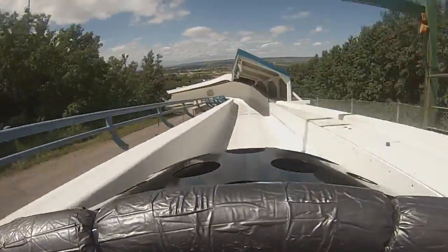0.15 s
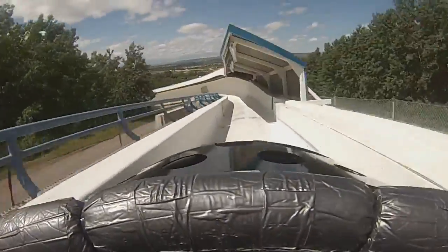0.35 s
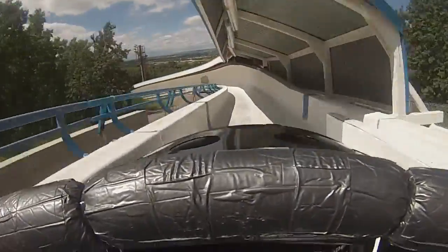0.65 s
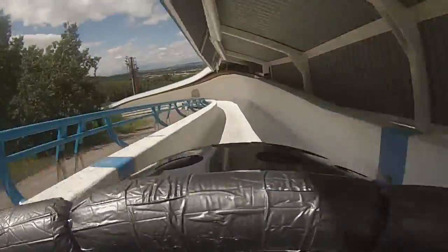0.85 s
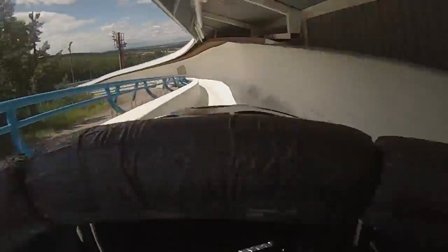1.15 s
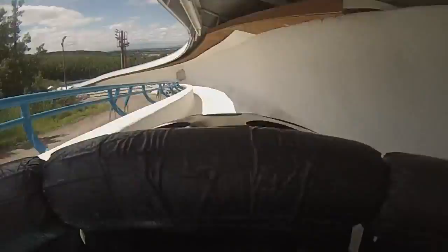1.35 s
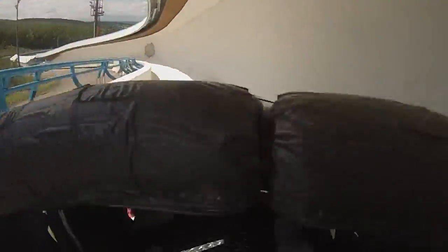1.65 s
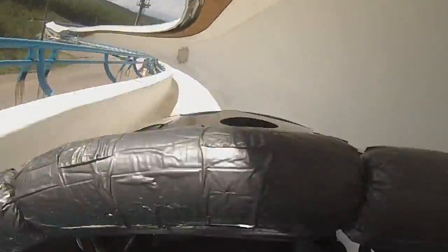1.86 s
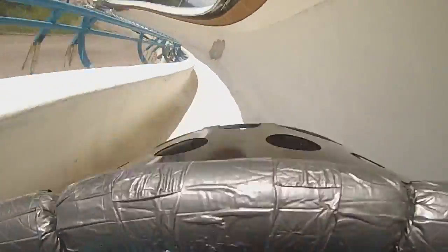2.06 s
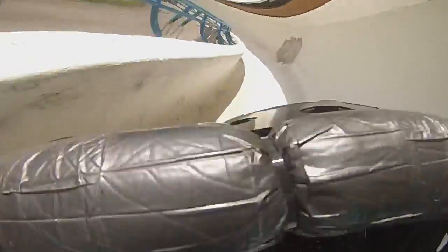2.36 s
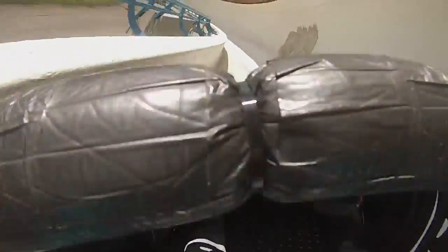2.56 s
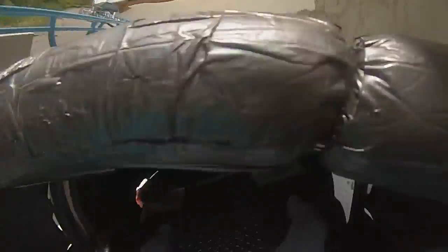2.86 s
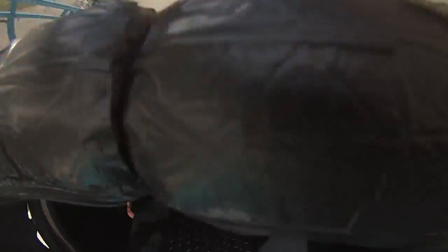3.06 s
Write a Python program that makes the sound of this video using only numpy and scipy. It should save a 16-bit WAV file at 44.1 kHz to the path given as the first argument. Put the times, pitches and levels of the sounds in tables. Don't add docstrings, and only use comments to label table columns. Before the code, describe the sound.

A wheeled sled roars over concrete throughout, gritty and bright, heard close and boxy inside an onboard housing. Thumps and ringing jolts cluster from 0.2 to 0.9 seconds, peaking in a hard thump near 0.93. The roar drops around 1.0-1.3, swells near 1.6, thumps at 1.9 and 2.2, then rebuilds from 2.5 with rattles and scrapes, loudest after 2.9. Wind rumbles and buffets underneath.

```python
import sys
import numpy as np
from scipy import signal
from scipy.fft import rfft, irfft, next_fast_len
from scipy.io import wavfile
from scipy.ndimage import uniform_filter1d, map_coordinates

SR = 44100
rng = np.random.default_rng(int(sys.argv[2]) if len(sys.argv) > 2 else 0)


def store_pcm(level_fs):
    pcm = np.round(np.clip(level_fs, -1, 1) * 32767).astype(np.int16)
    wavfile.write(sys.argv[1], SR, np.atleast_2d(pcm).T)


def gain_from_db(level_db):
    decades = np.asarray(level_db, float) / 20
    return 10 ** decades


N = 141561

# (time [s], strength [dB], brightness [dB], hull
# load [dB])
ROLLING_COURSE = [(0.0, -24, -1.5, 4), (0.19, -20.5, 3.5, 4), (0.25, -26, 0.5, 2), (0.39, -20, -1, 5),
                  (0.87, -15, 1, -1.5), (0.934, -21, -4, -18), (0.948, -36.5, 1, 5), (1.05, -26.5, 0, 0),
                  (1.23, -29.5, -3.5, 8.5), (1.27, -25.5, 2, 4.5), (1.64, -18.5, -0.5, 1.5),
                  (2.15, -27, 1, 6), (2.5, -20.5, -1, 1.5), (2.96, -15, 2.5, -1.5), (3.0, -19.5, -3.5, 8),
                  (3.02, -13.5, -4.5, -7.5), (3.15, -18.5, 1, 6.5), (3.21, -11.5, -4, -3)]
# (time [s], hiss swing [dB], cavity swing [dB], half length [s])
CONCRETE_PATCHES = [(0.132, -5, 2, 0.023), (1.983, 1.5, 1, 0.035), (0.9, 3, 1.5, 0.03),
                    (0.325, -8, 5, 0.0069), (0.397, 3.5, 4, 0.035), (0.498, 5, 1, 0.03),
                    (0.572, 4, 1.5, 0.022), (3.02, 4.5, -2.5, 0.056), (0.738, 2.5, 5, 0.023),
                    (0.808, 0, -15, 0.011), (0.828, 4.5, 6, 0.039), (0.976, 9.5, 5.5, 0.05),
                    (1.13, 6.5, 6, 0.027), (1.172, -9.5, 0, 0.014), (1.304, -9, -3, 0.021),
                    (1.404, 4, 2, 0.017), (1.455, -4, -5, 0.11), (1.504, 5.5, 4, 0.012),
                    (1.589, 3, 7.5, 0.011), (1.742, 3.5, 5, 0.036), (1.864, -3.5, -6.5, 0.042),
                    (1.895, 7.5, 11.5, 0.014), (2.12, -8, -7, 0.037), (2.374, 4.5, -4, 0.017),
                    (2.51, 8, -0.5, 0.032), (2.631, 3.5, 5, 0.024), (2.761, 2, 4, 0.047),
                    (2.832, -5, -14, 0.034), (2.86, 2, 3.5, 0.027), (2.93, -2, 2, .018)]
# (time [s], peak [dB], rise [s], low push [dB], t60 [s])
TRACK_JOINTS = [(.232, -3, 0.0069, -23, 0.12), (0.2443, -12, 0.004, -8, .045),
                (0.2572, -3, 0.0029, -13, 0.08), (0.4294, -9, 0.0024, -24, 0.12),
                (.462, -13, 0.0018, -18, 0.071), (0.528, -26, .003, -15, 0.12),
                (0.609, -17, 0.0034, -23, 0.24), (0.651, -19, .003, -20, 0.19),
                (0.722, -19.5, 0.0025, -26, 0.14), (0.791, -19, 0.0028, -30, 0.12),
                (0.928, 1, 0.001, -9, 0.047), (1.476, -22.5, 0.0045, -30, 0.31),
                (1.622, -17, 0.0071, -34, 0.2), (1.9174, -6, 0.00052, -4, 0.14),
                (2.2019, -3, 0.004, -8.5, 0.13), (2.639, -11.5, 0.0046, -32, 0.15),
                (2.896, -29, .003, -19, 0.31)]
# (time [s], peak [dB], half length [s])
WIND_HEAVES = [(.089, -18, 0.013), (.252, -23, 0.0079), (0.442, -11.5, 0.01), (0.607, -16.5, 0.015),
               (0.705, -16, 0.0084), (0.749, -12.5, .013), (0.828, -36, 0.016), (0.91, -23, 0.0089),
               (1.538, -18.5, 0.013), (1.807, -12.5, 0.019), (1.872, -18, 0.02), (2.249, -25, 0.0072),
               (2.501, -23, .011), (2.77, -14, 0.02), (3.076, -19, .02), (3.14, -20, 0.013)]
# (time [s], level [dB])
MOUNT_RATTLES = [(.145, -17.5), (0.191, -19), (.485, -27), (.575, -30), (0.823, -22), (1.496, -16.5),
                 (1.891, -19), (1.91, -27), (1.976, -20), (2.211, -31), (2.368, -32), (2.485, -15.5),
                 (2.509, -17.5), (2.637, -14), (2.86, -20), (2.933, -13), (2.962, -11.5), (3.021, -15)]
# (time [s], peak [dB], pitch [Hz], t60 [s])
AIR_RINGS = [(0.1086, -13, 1468, 0.12), (0.1436, -10.5, 1490, 0.094), (0.395, -12.5, 1604, 0.16),
             (0.507, -10.5, 1492, 0.12), (0.5437, -11, 1583, 0.095), (0.6379, -13, 1580, 0.12),
             (0.6918, -5, 1463, 0.11), (0.7208, -2, 1577, 0.073), (0.7529, -2, 1501, 0.081),
             (0.821, -8, 1560, 0.12), (0.8927, -10.5, 1490, 0.11), (1.296, -14, 1520, 0.08),
             (1.4086, -14, 1500, 0.12), (1.495, -8.5, 1540, 0.13), (1.6588, -11, 1475, 0.09),
             (1.7516, -10.5, 1490, 0.1), (1.8934, -22, 1510, 0.083), (2.4279, -20, 1597, 0.12),
             (2.5132, -12, 1420, 0.12), (2.588, -12, 1506, 0.15), (2.7315, -10, 1576, 0.11),
             (2.799, -13, 1500, 0.11), (2.8607, -4, 1473, 0.16), (2.9342, -9, 1455, 0.14),
             (3.0754, -11, 1563, 0.12), (3.1564, -15, 1540, 0.12), (3.187, -2.5, 1484, 0.1)]
# (time [s], peak [dB], t60 [s])
TYRE_SCRAPES = [(0.0817, -26, 0.15), (0.191, -31, 0.11), (0.4873, -10.5, 0.13), (0.5447, -12, 0.17),
                (0.5741, -13, 0.12), (0.6853, -13.5, 0.12), (0.7144, -27, 0.15), (0.7404, -19, 0.15),
                (0.8195, -10, 0.17), (1.0246, -18.5, 0.15), (1.4042, -34, 0.14), (1.4955, -16, 0.15),
                (1.5628, -28, 0.15), (1.5864, -16, 0.12), (1.6267, -31, 0.15), (1.727, -16, 0.14),
                (1.8118, -17, 0.15), (1.8906, -30, 0.15), (1.9076, -28, 0.13), (2.2134, -24, 0.15),
                (2.366, -14, 0.17), (2.5092, -10.5, 0.2), (2.5834, -16, 0.15), (2.6294, -18, 0.15),
                (2.7554, -18, 0.15), (2.7764, -13, 0.15), (2.8534, -19, 0.18), (2.9347, -8.5, 0.16),
                (3.0195, -17, 0.13), (3.1104, -13, 0.2), (3.1807, -13, 0.15)]
# (frequency [Hz], width [Hz], level [dB])
SHELL_MODES = [(477.3, 8.7, -3), (811, 21, -5), (1032.5, 27, -3.5), (1249, 74, 0.5), (2106, 264, -1.5),
               (2338, 67, 3.5), (2544, 129, -0.5), (2990, 173, -4), (3608, 150, -9), (4420, 260, -9.5),
               (5105, 330, -9), (6033, 123, -7.5)]
# (frequency [Hz], width [Hz], level [dB])
LATCH_MODE = [(7030, 70, -15)]
# (frequency [Hz], width [Hz], level [dB])
CAVITY_MODES = [(1479, 90, 1), (1627, 110, -1.5)]
# (frequency [Hz], width [Hz], level [dB])
COVER_MODES = [(4860, 59, -0.5), (5570, 42, -5), (5950, 49, -2.5), (7040, 70, 0), (8060, 67, -1),
               (9980, 720, -7.5)]
# (frequency [Hz], level per Hz [dB])
AIR_COLOUR = [(150, -6), (350, 1.5), (1100, -2.5), (2500, 0), (3900, -7), (6000, -8.5), (9800, -16),
              (15200, -29)]
# (frequency [Hz], level per Hz [dB])
SCRAPE_COLOUR = [(3000, -28), (5000, 6), (7000, 2), (10000, -8), (15200, -21)]
# (frequency [Hz], level per Hz [dB])
RUMBLE_COLOUR = [(12, 11.5), (30, -0.5), (55, -0.5), (130, -5.5), (250, -20.5), (500, -18)]
# (frequency [Hz], side over mid [dB])
SIDE_LEVEL = [(60, -41), (180, -26), (540, -27), (1620, -25), (4870, -21), (14600, -21)]

GRIT_PER_S, GRIT_SPREAD_DB, GRIT_SHARE = 3000, 4.5, 0.52
AIR_DB, CAVITY_DB = -1.5, -2
RISE_SHARE = 0.24
MIDS_FOLLOW, TOP_FOLLOWS = 0.41, 0.72
LOWS_DB, LOWS_GROW = -2, -0.079
RING_DB, RING_RISE_S = -5, 0.0012
SCRAPE_DB, RATTLE_T60_S = -13, 0.043
HULL_HZ, HUM_WIDE_HZ, HUM_DB = 98.8, 44.4, -14
SAG_HZ, SAG_S = 8.7, 0.004
AFTER_DB, AFTER_T60_S = -19, 0.32
PUSH_AT_S, PUSH_S = 0.0089, 0.0029
RUMBLE_DB, SWELL_SHARE, SWELL_WIDER = -11.5, 0.4, 3.1
PORT_HZ, PORT_WIDE_HZ, PORT_DIP_DB = 8590, 347, -3.5
TOP_HZ = 15300


def unit(x):
    return x / np.sqrt(np.mean(x ** 2) + 1e-20)


def along(points, hz):
    f, value = np.transpose(points)
    return np.interp(np.log(hz + 1), np.log(f + 1), value)


def wobble(rate):
    knots = rng.standard_normal(int(N * rate / SR) + 4)
    return map_coordinates(knots, [np.arange(N) * rate / SR])


def filtered(x, response):
    m = next_fast_len(N + SR // 2)
    return irfft(rfft(x, m) * response(np.fft.rfftfreq(m, 1 / SR)), m)[..., :N]


def above(x, corner_hz):
    return filtered(x, lambda hz: hz ** 4 / (hz ** 4 + corner_hz ** 4))


def resonances(modes):
    def response(f):
        total = 0
        for k, (centre, width, db) in enumerate(modes):
            damping = 1j * f * width
            total = total + (-1) ** k * gain_from_db(db) * damping / (centre ** 2 - f ** 2 + damping)
        return total
    return response


def covered(colour, cover_db):
    return lambda hz: gain_from_db(along(colour, hz)) * (1 + np.abs(gain_from_db(cover_db) * resonances(COVER_MODES)(hz)))


def burst(t, at, db, t60):
    return gain_from_db(db - 60 * np.clip(t - at, 0, 1) / t60) * (t > at)


def patchy(x, patchy_db, lines_db):
    for size, wide, long, depth_db in [(512, 10, 8, patchy_db), (2048, 2, 6, lines_db)]:
        z = signal.stft(x, nperseg=size)[2]
        field = uniform_filter1d(rng.standard_normal(z.shape), wide, 0)
        field = uniform_filter1d(field, long, 1)
        x = signal.istft(z * gain_from_db(depth_db * unit(field)), nperseg=size)[1][:N]
    return unit(x)


def controls():
    t = np.arange(N) / SR
    s, *columns = np.transpose(ROLLING_COURSE)
    strength_db, bright_db, load_db = [np.interp(t, s, c) for c in columns]
    swing_db = np.zeros((2, N))
    for at, hiss_db, cavity_db, half in CONCRETE_PATCHES:
        length = np.where(t < at, RISE_SHARE * half, half)
        swing_db += np.outer([hiss_db, cavity_db], np.exp(-((t - at) / length) ** 2))
    hull_load_db = strength_db + load_db + 0.8 * wobble(25)
    return gain_from_db(strength_db), swing_db, bright_db, hull_load_db


def gritty():
    hits = rng.random(N) < GRIT_PER_S / SR
    sizes = gain_from_db(GRIT_SPREAD_DB * np.clip(rng.standard_normal(N), -2, 2))
    grit = hits * sizes * rng.standard_normal(N)
    return GRIT_SHARE * unit(grit) + (1 - GRIT_SHARE) * rng.standard_normal(N)


def rolling(strength, swing_db, bright_db):
    drive = gritty() * gain_from_db(0.38 * wobble(29.8))
    shell = patchy(filtered(drive, resonances(SHELL_MODES + LATCH_MODE)), patchy_db=2.0, lines_db=3.0)
    cavity = filtered(drive, lambda f: resonances(CAVITY_MODES)(f) * resonances([(1500, 500, 0)])(f))
    cavity = patchy(cavity, patchy_db=1.0, lines_db=1.5)
    rush = 0.65 * gritty() + 0.74 * rng.standard_normal(N)
    air = patchy(filtered(rush, covered([(60, -120)] + AIR_COLOUR, 1)), patchy_db=1.36, lines_db=1.9)
    both = unit(shell + gain_from_db(AIR_DB) * air)

    high = above(both, 3300)
    mids = (both - high) * gain_from_db(MIDS_FOLLOW * swing_db[0] + 0.3 * wobble(23.99))
    lows = filtered(mids, lambda hz: 900 ** 4 / (hz ** 4 + 900 ** 4))
    mids = mids + lows * (gain_from_db(LOWS_DB) * (strength / strength.mean()) ** LOWS_GROW - 1)
    top = above(high, 9500)
    surface_db = bright_db + swing_db[0] + 1.1 * wobble(22)
    hiss = (high - top) * gain_from_db(surface_db) + top * gain_from_db(TOP_FOLLOWS * surface_db - 3.0)
    return strength * gain_from_db(-3.0) * (mids + hiss + cavity * gain_from_db(CAVITY_DB + swing_db[1]))


def rings():
    out = np.zeros(N + SR)
    t = np.arange(SR // 4) / SR
    for (s, db, hz, t60), turn in zip(AIR_RINGS, rng.random(len(AIR_RINGS))):
        envelope = gain_from_db(db + RING_DB - 60 * t / t60) * (1 - np.exp(-t / RING_RISE_S))
        out[round(s * SR):][:len(t)] += envelope * np.sin(2 * np.pi * (hz * t + turn))
    return out[:N] * gain_from_db(1.55 * wobble(120))


def scrapes():
    t = np.arange(N) / SR
    shake = sum(burst(t, s, db + SCRAPE_DB, t60) for s, db, t60 in TYRE_SCRAPES)
    noise = 0.26 * gritty() + rng.standard_normal(N)
    return shake * unit(filtered(noise, covered([(1500, -120)] + SCRAPE_COLOUR, 2)))


def rattles():
    t = np.arange(N) / SR
    shake = sum(burst(t, s, db, RATTLE_T60_S) for s, db in MOUNT_RATTLES)
    body = lambda f: resonances(SHELL_MODES)(f) + gain_from_db(0.5) * resonances(CAVITY_MODES)(f)
    noise = rng.standard_normal(N)
    return filtered(noise * shake, body) / filtered(noise, body).std()


def hull(load_db):
    hum = filtered(rng.standard_normal(N), lambda f: resonances([(HULL_HZ, HUM_WIDE_HZ, 0)])(f) ** 2)
    out = np.zeros(N + SR)
    t = np.arange(SR // 3) / SR
    tone = np.sin(2 * np.pi * (HULL_HZ * t + SAG_HZ * SAG_S * (1 - np.exp(-t / SAG_S))))
    push = np.exp(-((t - PUSH_AT_S) / PUSH_S) ** 2) * np.tanh(t / PUSH_S)
    for s, db, rise, push_db, t60 in TRACK_JOINTS:
        decay = gain_from_db(db - 60 * t / t60) + gain_from_db(db + AFTER_DB - 60 * t / AFTER_T60_S)
        ring = tone * decay * (1 - np.exp(-t / rise))
        out[round(s * SR):][:len(t)] += ring - gain_from_db(push_db) * push
    return out[:N] + unit(hum) * gain_from_db(load_db + HUM_DB + 1.2 * wobble(14))


def wind(load_db):
    t = np.arange(N) / SR
    colour = [(3, -60)] + RUMBLE_COLOUR + [(1500, -120)]
    rumble = unit(filtered(rng.standard_normal(N), lambda hz: gain_from_db(along(colour, hz))))
    heave = np.zeros(N)
    for s, db, half in WIND_HEAVES:
        swell = SWELL_SHARE * np.exp(-((t - s) / (SWELL_WIDER * half)) ** 2)
        suck = (1 + SWELL_SHARE) * np.exp(-((t - s) / half) ** 2)
        heave += gain_from_db(db) * (swell - suck)
    return rumble * gain_from_db(load_db + RUMBLE_DB + 1.3 * wobble(8.96)) + heave


def scene():
    strength, swing_db, bright_db, load_db = controls()
    mid = rolling(strength, swing_db, bright_db) + rings() + scrapes() + rattles()
    mid = mid + hull(load_db) + wind(load_db)
    return np.array([mid, mid])


def side_flicker(mid):
    lead = 1024 - 688
    hz, t, z = signal.stft(np.pad(mid, (lead, 0)), SR, nperseg=2048)
    band = (np.sqrt(hz) / 3).astype(int)
    reach_hz = 15000 * rng.random(len(t)) ** 0.49
    moments = rng.random(len(t)) < 0.3
    bands = (rng.random((band.max() + 1, len(t))) < 0.7)[band]
    split = moments * bands * (hz[:, None] < reach_hz)
    scatter = np.exp(2j * np.pi * rng.random(z.shape))
    noise = z * split * scatter * gain_from_db(along(SIDE_LEVEL, hz) + 7.5)[:, None]
    return signal.istft(noise, SR, nperseg=2048)[1][lead:][:N]


def band_limit(x):
    return signal.sosfilt(signal.butter(12, 15230, fs=SR, output="sos"), x)


def record(dry):
    x = filtered(dry, lambda hz: (hz < TOP_HZ) * 1j * hz / (8 + 1j * hz))
    x = filtered(x, lambda hz: gain_from_db(PORT_DIP_DB * np.exp(-((hz - PORT_HZ) / PORT_WIDE_HZ) ** 2)))
    x = x / (1 + np.abs(x / 0.95) ** 10) ** 0.1
    mix = x + np.outer([1, -1], side_flicker(x[0]))
    return band_limit(mix)


dry = scene()
out = record(dry)
store_pcm(out)
```